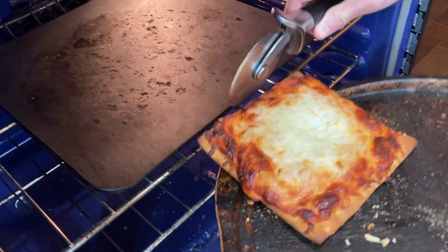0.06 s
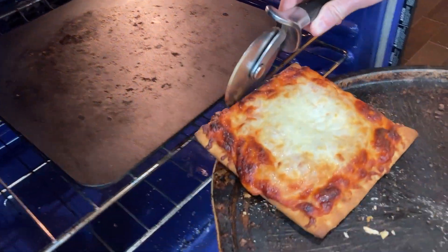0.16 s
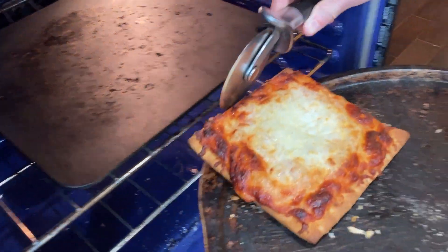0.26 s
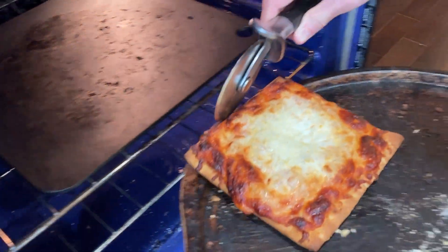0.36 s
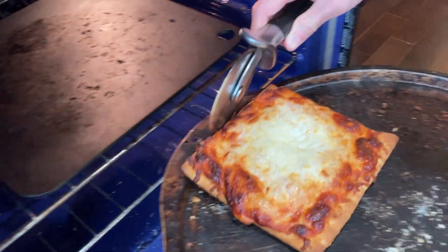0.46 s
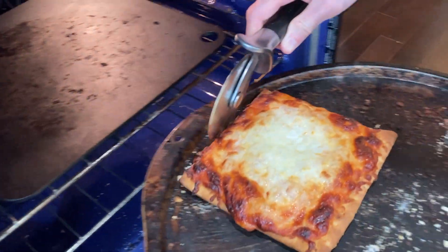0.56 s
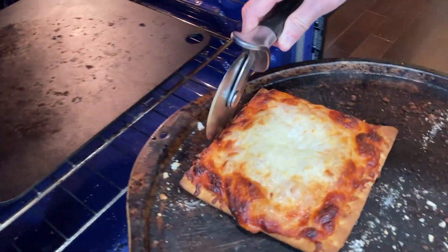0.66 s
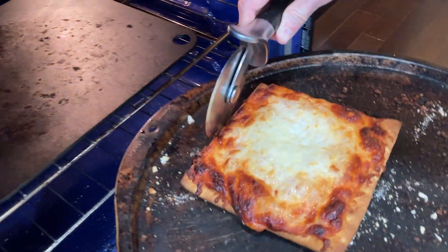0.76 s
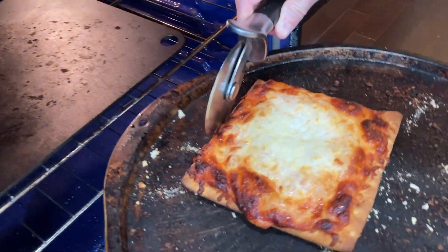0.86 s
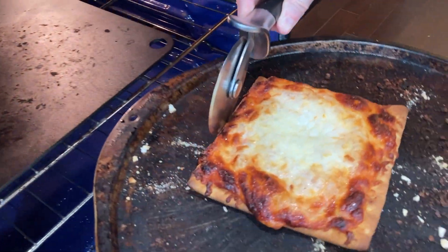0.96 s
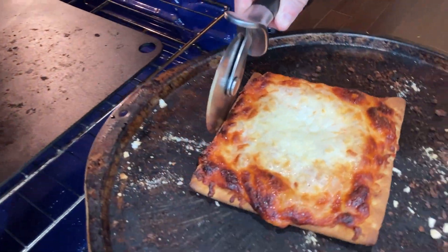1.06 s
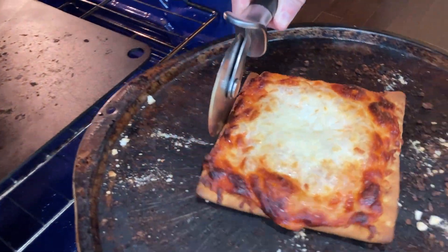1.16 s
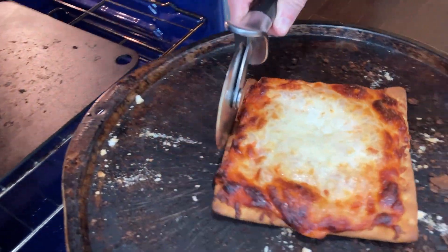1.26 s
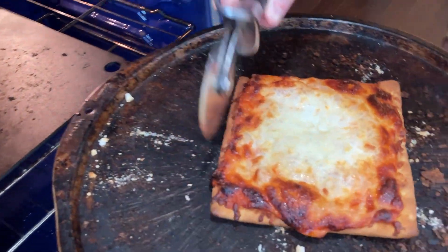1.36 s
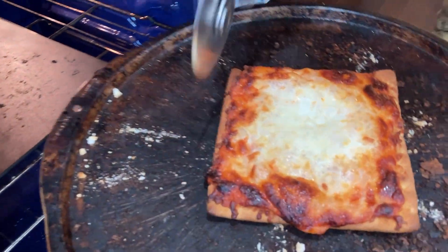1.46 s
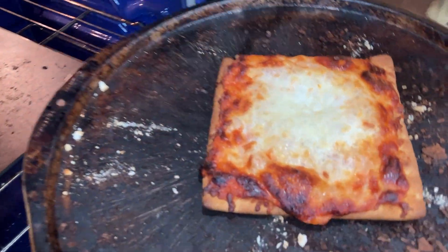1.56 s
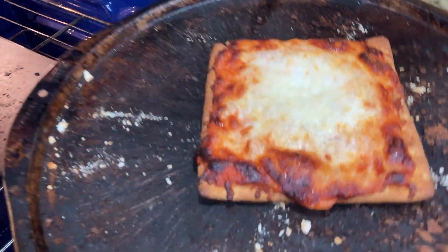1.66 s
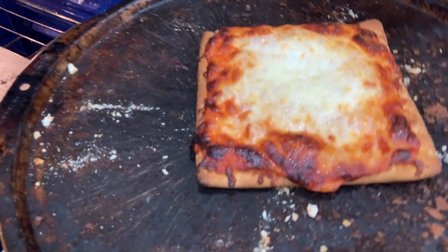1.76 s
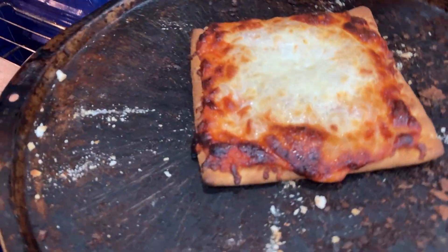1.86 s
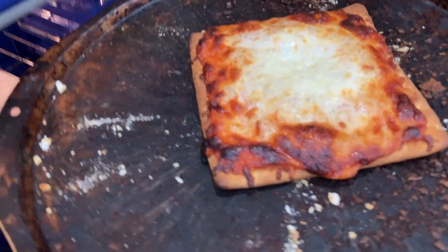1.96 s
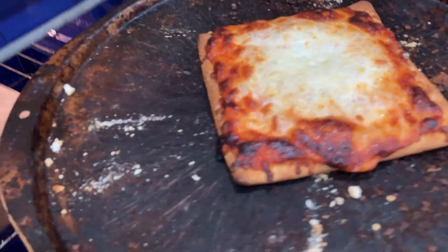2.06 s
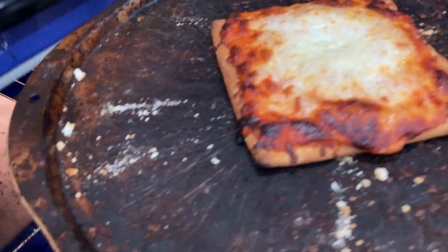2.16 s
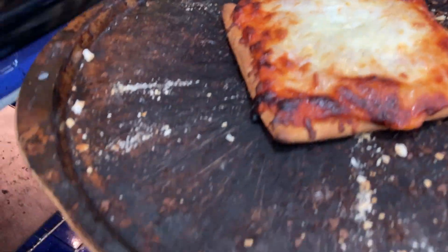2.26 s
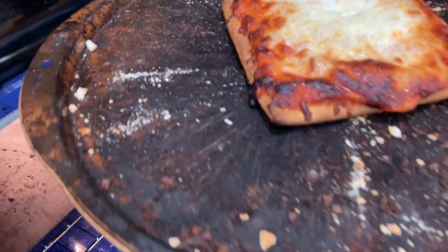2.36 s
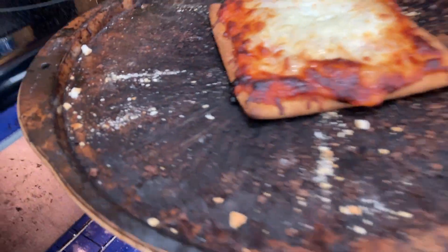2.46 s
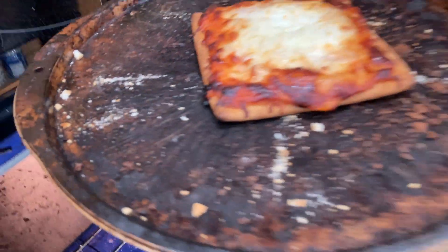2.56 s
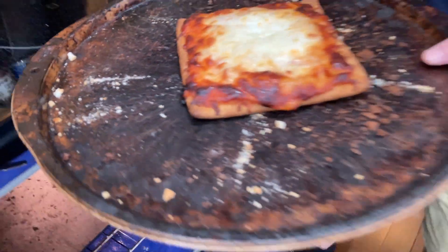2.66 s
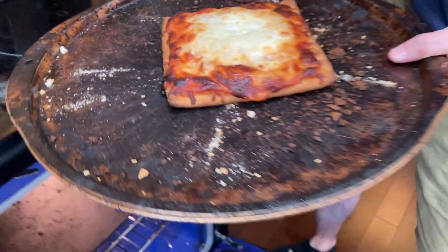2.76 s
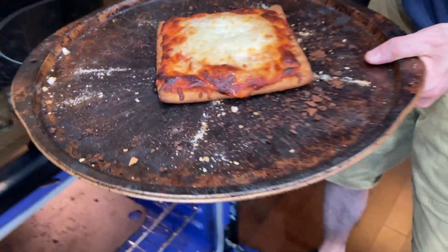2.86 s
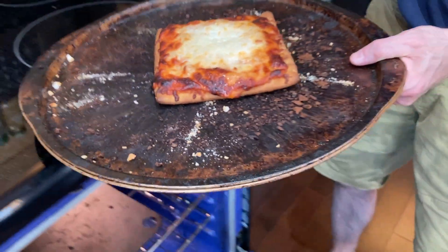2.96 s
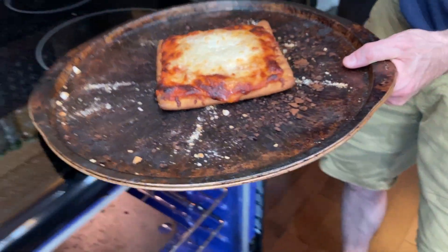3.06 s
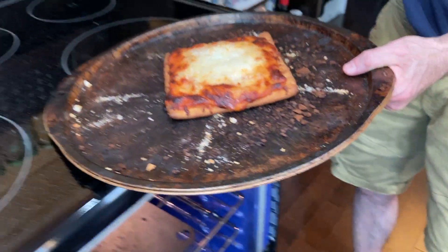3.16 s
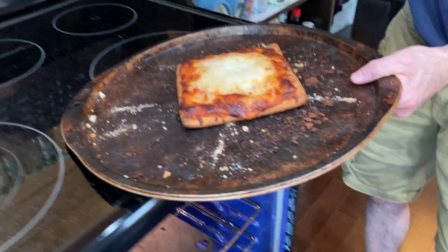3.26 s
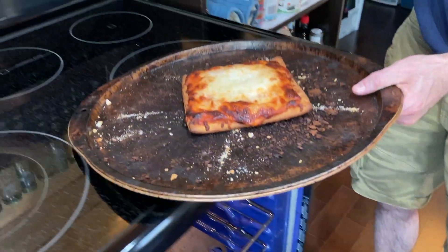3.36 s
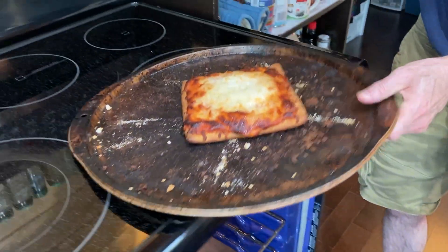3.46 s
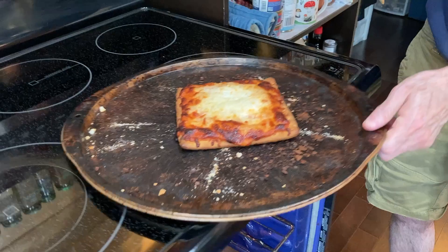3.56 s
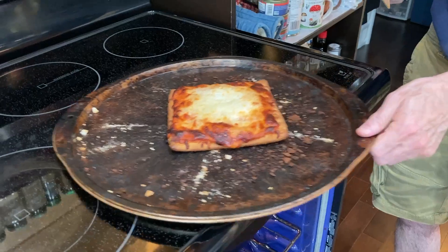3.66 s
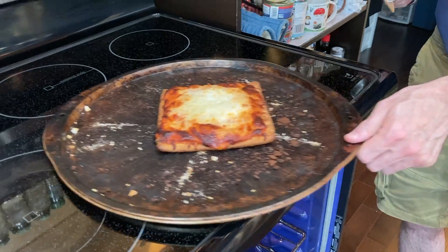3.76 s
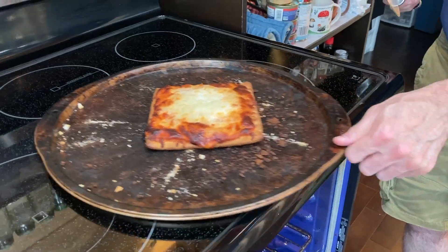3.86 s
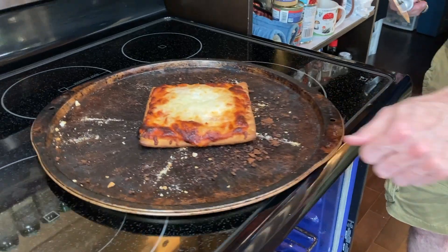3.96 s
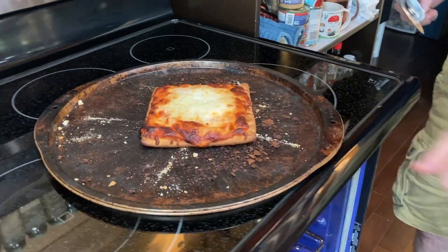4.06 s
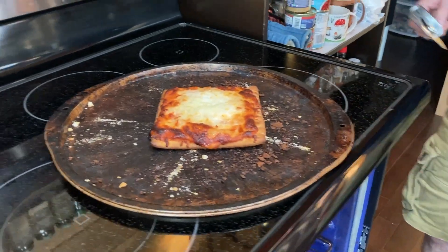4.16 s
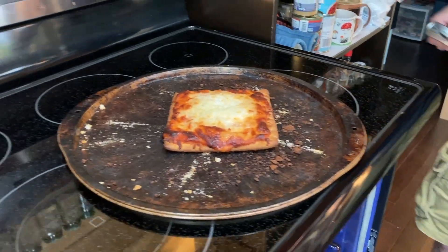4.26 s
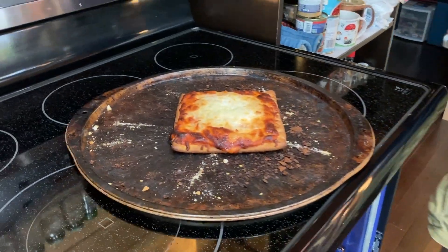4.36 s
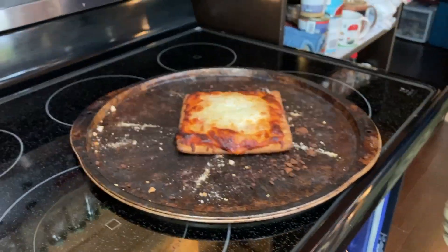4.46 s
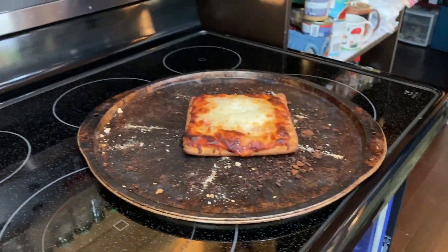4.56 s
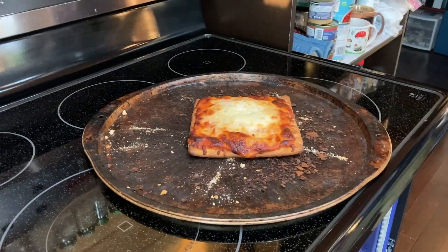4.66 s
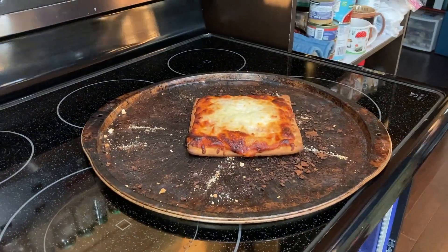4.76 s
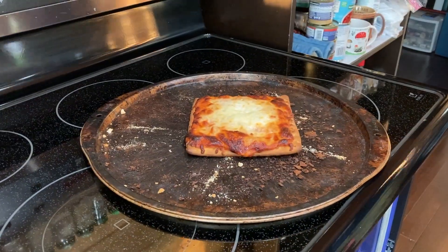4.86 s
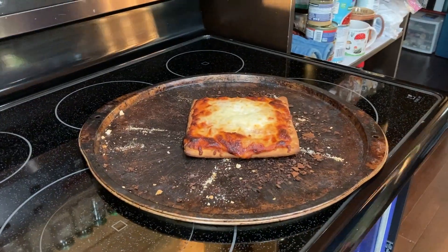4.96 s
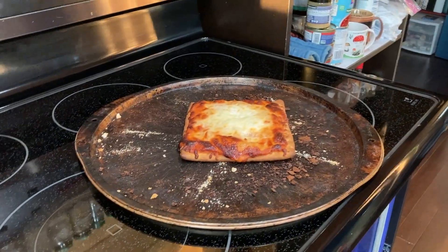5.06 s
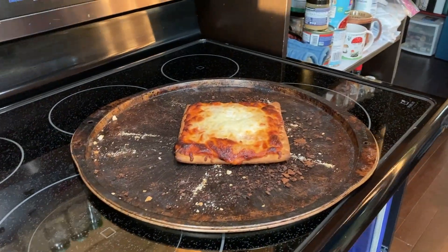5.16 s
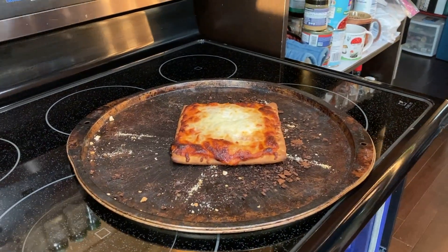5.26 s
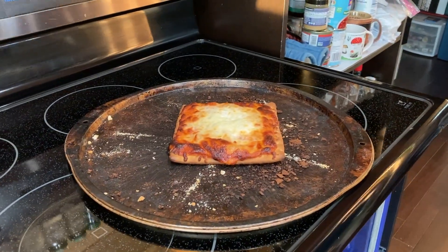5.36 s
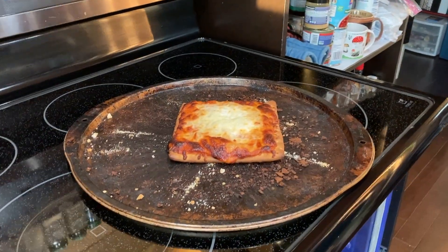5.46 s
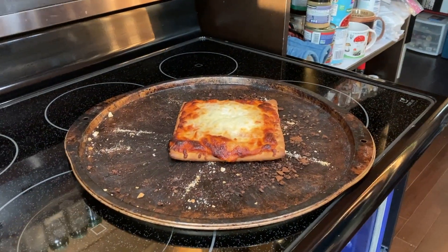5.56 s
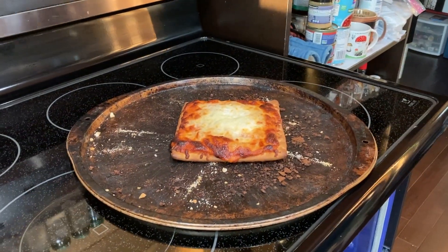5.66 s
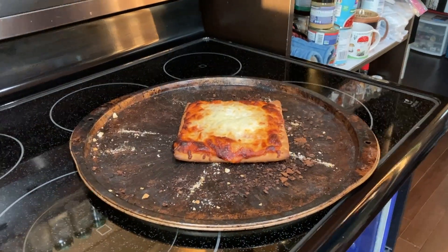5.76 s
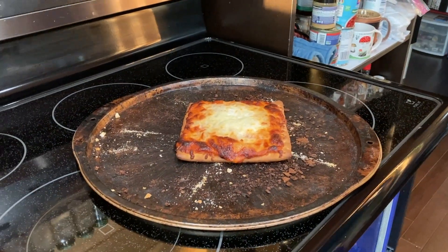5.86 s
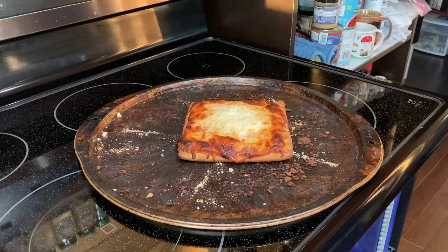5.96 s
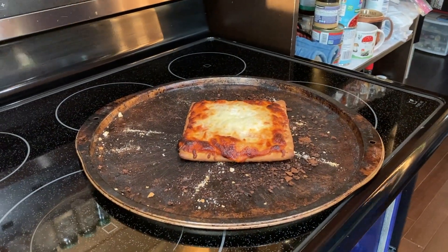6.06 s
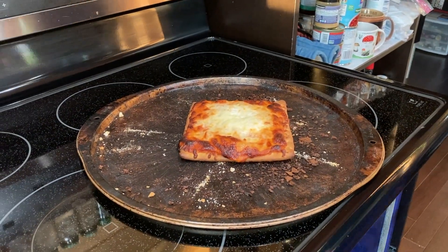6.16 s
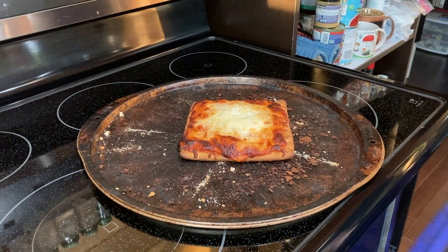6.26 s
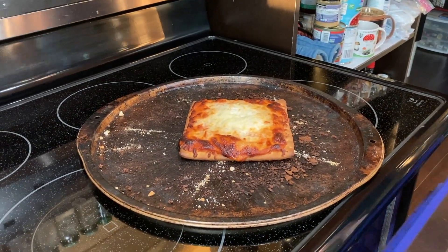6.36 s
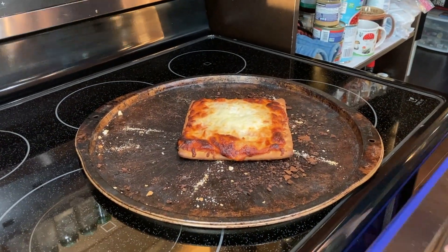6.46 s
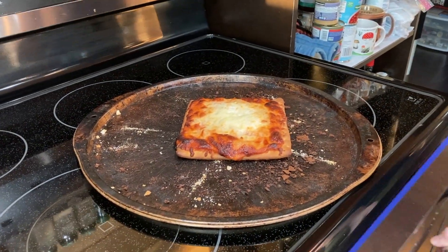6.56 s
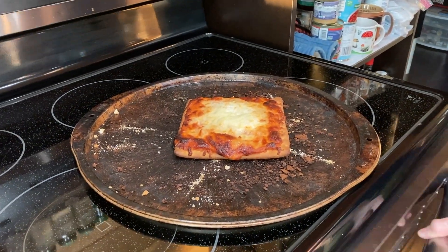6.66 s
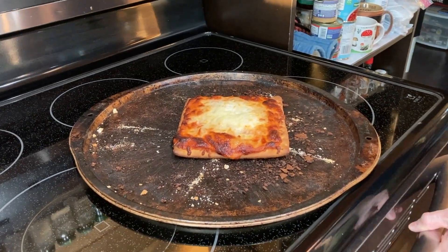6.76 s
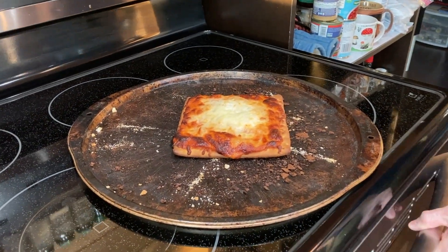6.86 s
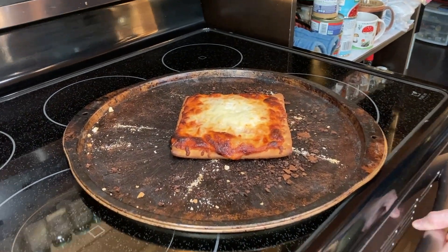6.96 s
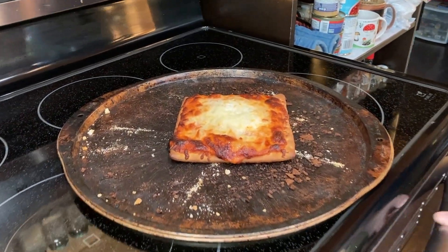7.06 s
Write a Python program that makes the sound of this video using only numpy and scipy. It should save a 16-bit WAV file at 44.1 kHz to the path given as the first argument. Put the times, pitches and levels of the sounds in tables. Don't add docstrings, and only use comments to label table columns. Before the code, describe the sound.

In a humming kitchen, crust scrapes and squeaks over metal, the pan clanks against a rack, slides on glass, and an oven door closes.

```python
import sys
import numpy as np
from scipy import signal
from scipy.fft import rfft, irfft, next_fast_len
from scipy.io import wavfile

SR = 44100
rng = np.random.default_rng(int(sys.argv[2]) if len(sys.argv) > 2 else 0)


def materialize(psi):
    bounded = np.clip(np.atleast_2d(psi).T, -1, 1)
    quanta = np.round(bounded * 32767).astype(np.int16)
    wavfile.write(sys.argv[1], SR, quanta)


def invert_db(x):
    u = np.asarray(x, float) / 20
    return 10 ** u


N = 314080

# pitch_hz, left_minus_right_db
LEAN = [(60, -2), (400, 0.7), (1300, 0.5), (2400, 3), (4400, 1.5)]
# pitch_hz, level_db over the broad colour
PAN_ON_HOB = [(465, 5.5), (545, 6), (730, -5.5), (1050, -6), (1220, -5), (1500, -6.5), (1680, -11),
              (1810, -1), (2040, 5), (2380, 3.5), (2740, 0.5), (3250, -3.5), (3650, -1.5), (4250, 0),
              (4800, 3.5)]


def rms_one(x):
    return x / np.sqrt(np.mean(x ** 2) + 1e-20)


def at_hz(points, hz):
    pitches, values = np.array(points).T
    return np.interp(np.log(hz), np.log(pitches), values)


def by_law(law, hz):
    pitches, *columns = np.transpose(law)
    return [np.interp(np.log(hz), np.log(pitches), c) for c in columns]


def drift(rate, size):
    r = np.exp(-32 * np.pi * rate / SR)
    noise = rng.standard_normal(size // 16 + 2002)
    slow = signal.lfilter([1], [1, -2 * r, r * r], noise)[2000:]
    return np.interp(np.arange(size) / 16, np.arange(len(slow)), rms_one(slow))


def swell_gate(time, start_s, stop_s, edge_s):
    return np.clip(np.minimum(time - start_s, stop_s - time) / edge_s, 0, 1)


def ring(clicks, hz, t60):
    r, w = invert_db(-60 / (t60 * SR)), 2 * np.pi * hz / SR
    return signal.lfilter([0, np.sin(w)], [1, -2 * r * np.cos(w), r * r], clicks + 1e-18)


def port_skew(hz):
    return 0.35 * np.minimum(1, hz / 900) * rng.standard_normal()


def bank(white, gain_at, likeness=None):
    # pitch_hz, left-right likeness from -1 to 1
    close_likeness = [(30, 0.72), (70, 0.96), (130, 0.94), (290, 1), (640, 0.92), (1400, 0.34),
                      (2400, 0.012), (4500, 0.57), (5500, .01)]
    edges_hz = 28 * 2 ** np.arange(0, 9.4, .4)
    out = 0
    for k, (low, high) in enumerate(zip(edges_hz, edges_hz[1:])):
        band = signal.butter(2, [low, high], "band", fs=SR, output="sos")
        mid, side = signal.sosfilt(band, white[k % 2])
        hz = np.sqrt(low * high)
        alike = np.clip(at_hz(likeness or close_likeness, hz), -1, 1)
        lean = invert_db(at_hz(LEAN, hz) / 2)
        pair = np.sqrt(1 + alike) * mid + np.sqrt(1 - alike) * side * [[1], [-1]]
        out = out + gain_at(hz) * pair * [[lean], [1 / lean]]
    return out


def sheet(x, peaks, ring_db, wander_db, wander_rate):
    out = x.copy()
    for hz, db in peaks:
        r = np.exp(-np.pi * (20 + 0.023 * hz) / SR)
        wander = wander_db * np.minimum(drift(wander_rate, x.shape[1]), 1)
        drive = x * invert_db(ring_db + db + wander)
        top, bottom = [(1 - r * r) / 2, 0, (r * r - 1) / 2], [1, -2 * r * np.cos(2 * np.pi * hz / SR), r * r]
        out += signal.lfilter(top, bottom, drive)
    return out


def friction(table, law, mean_db, peaks, per_s, size_db, judder_db, ring_db, trim_db, dead):
    # pitch_hz, level_db per Hz
    grit_colour = [(30, -5), (80, -2), (200, 1.5), (450, -6.5), (1600, -9.5), (2300, -9), (3000, -9),
                   (4500, -10), (7000, -11.5), (11000, -12.5), (16000, -24)]
    # low_hz, high_hz
    dead_band = [2890, 3120]
    s, *levels = np.transpose(table)
    start, stop = round(s[0] * SR), min(round(s[-1] * SR), N)
    size = stop - start
    pressure_db, second_db = [np.interp(np.arange(start, stop) / SR, s, c) for c in levels]

    def gain(hz):
        offset_db, follows, share = by_law(law, hz)
        level_db = mean_db[0] + offset_db + follows * (pressure_db - mean_db[0])
        level_db = level_db + share * (second_db - mean_db[1])
        return invert_db(at_hz(grit_colour, hz) + level_db + trim_db + 1.43 * drift(24, size))

    catches = (rng.random(size) < per_s / SR) * invert_db(size_db * np.minimum(rng.exponential(1, size), 4))
    judder = invert_db(judder_db * drift(70, size))
    x = bank(rms_one((catches + 0.47) * rng.standard_normal((2, 2, size)) * judder), gain)
    x = x - dead * signal.sosfilt(signal.butter(1, dead_band, "band", fs=SR, output="sos"), x)
    fade_out = np.minimum(1, np.arange(size, 0, -1) / 900)
    out = np.zeros((2, N))
    out[:, start:stop] = sheet(x, peaks, ring_db, wander_db=5, wander_rate=8.9) * fade_out
    return out


def struck(modes, blows):
    s, db, tilt_db = np.transpose(blows)
    at = np.round(s * SR).astype(int)
    spread_db = 1
    out = np.zeros((2, N))
    for hz, level_db, t60 in modes:
        strength = spread_db * rng.standard_normal((len(at), 3)).T
        lean_db = at_hz(LEAN, hz) * np.array([[.5], [-.5]])
        blow_db = db + tilt_db * np.log2(hz / 400) + level_db
        clicks = np.zeros((2, SR))
        clicks[:, at - at[0]] = invert_db(blow_db + strength[0] + strength[1:] + lean_db)
        out[:, at[0]:at[0] + SR] += ring(clicks, hz, t60) * rng.choice([-1, 1])
    return signal.sosfilt(signal.butter(4, 135, "high", fs=SR, output="sos"), out + 1e-18)


def dying_notes(rows):
    out = np.zeros((2, N))
    for s, db, hz, t60 in rows:
        start = round(s * SR)
        t = np.arange(min(round(t60 * SR), N - start)) / SR
        skew = port_skew(hz)
        rise = np.minimum(1, t * hz * (2.0 if t60 * hz > 12 else .7))
        wave = np.sin(2 * np.pi * hz * t + [[skew], [-skew]])
        out[:, start:][:, :len(t)] += invert_db(db - 60 * t / t60) * wave * rise
    return out


def fan_hum():
    # pitch_hz, level_db
    tones = [(120, -68.5), (194, -77.5)]
    time = np.arange(N) / SR
    return sum(invert_db(db + 2.0) * np.sin(2 * np.pi * hz * time) for hz, db in tones)


def kitchen_air():
    # pitch_hz, level_db per Hz
    room_colour = [(30, -15.5), (60, 9), (120, 5), (250, -12.5), (1000, -23.5), (2300, -9.5), (3500, -45.5),
                   (8000, -28), (12000, -39.5), (16000, -47)]
    # pitch_hz, left-right likeness from -1 to 1
    room_likeness = [(60, 0.85), (180, 0.82), (550, 0.49), (1650, -0.18), (4970, -0.06), (15000, -0.94)]
    # pitch_hz, level_db per Hz
    moving_colour = [(30, 14.5), (80, 23), (450, 11.5), (1600, 9.5), (6000, 4.5), (11000, 7.5),
                     (16000, -3.5)]
    # pitch_hz, level_db relative to the tread
    tread_colour = [(60, 0), (200, -3.5), (450, -9.5), (1600, -16), (6000, -33)]
    # pitch_hz, level_db relative to the cloth, share of its swing
    cloth_law = [(80, -12, .5), (444.7, -0.5, 0.36), (1600, -1.7, 0.82), (6000, -6, 0.97)]
    # time_s, cloth_db, tread_db on the floor
    swing = [
        (1.4, -68.5, -71),
        (1.65, -71.5, -75),
        (1.82, -67.5, -77),
        (2.03, -62, -64.5),
        (2.24, -62, -66),
        (2.3, -73, -63),
        (2.6, -71.5, -75),
        (2.8, -78.5, -82),
        (3.14, -75.5, -60.5),
    ]
    # time_s, cloth_db, tread_db on the floor
    steps = [
        (4.2, -81.5, -64.5),
        (4.55, -78.5, -72),
        (4.96, -69.5, -57.5),
        (5.38, -70, -71.5),
    ]
    # time_s, cloth_db, tread_db on floor and door
    door = [
        (5.41, -76.5, -54),
        (5.65, -80, -62),
        (6.05, -77, -51),
        (6.25, -74.5, -54.5),
        (6.598, -72, -63.5),
        (6.95, -74.5, -59),
        (7.12, -75.5, -59.5),
    ]
    room_db, cloth_mean_db, flicker_db = -71, -68.5, 2
    time = np.arange(0, N, 16) / SR
    s, *levels = np.transpose(swing + steps + door)
    cloth_db, tread_db = [np.interp(time, s, c) for c in levels]
    busy = sum(swell_gate(time, m[0][0], m[-1][0] + .02, 0.007) for m in (swing, steps + door))

    def gain(hz):
        steady = invert_db(room_db + at_hz(room_colour, hz) + 16.0)
        offset_db, share = by_law(cloth_law, hz)
        cloth = invert_db(cloth_mean_db + offset_db + share * (cloth_db - cloth_mean_db))
        tread = invert_db(tread_db + at_hz(tread_colour, hz))
        moving = busy * np.hypot(cloth, tread) * invert_db(at_hz(moving_colour, hz))
        flicker = invert_db(flicker_db * drift(36 * 16, len(time)))
        return np.repeat(np.hypot(steady, moving) * flicker, 16)[:N]

    return bank(rng.standard_normal((2, 2, N)), gain, room_likeness)


def crust_drag():
    # time_s, pressure_db, speed_db as grit over body
    creep = [
        (0, -61.5, -13),
        (.112, -65, -16),
    ]
    nudge = [
        (0.118, -53.5, -11),
        (.19, -54, -10.5),
        (.264, -49, -13.5),
    ]
    shove = [(0.27, -41, -4), (.35, -40.5, -5.5), (.395, -35, -3.5), (.415, -36, -7.5), (.44, -33.5, -6),
             (.49, -35.5, -5), (.527, -31.5, -2.5), (.545, -43.5, -2), (.565, -35.5, -4.5),
             (.66, -38, -7.5), (.7, -35, -4), (.73, -38, -8), (.81, -41, -12.5)]
    last_shove = [
        (.825, -38, -7.5),
        (.905, -31, -9.5),
        (.975, -39.5, -7),
        (1.005, -34, -13),
        (1.045, -39.5, -9.5),
        (1.19, -34, -6),
        (1.27, -29, -10.5),
        (1.299, -34, -11),
        (1.335, -49, -10.5),
    ]
    let_go = (1.43, -82, 2)
    # pitch_hz, level_db relative to pressure, share of pressure swing, share of speed swing
    drag_law = [(60, -11, 0.32, 0.72), (153, -9.5, 0.85, -0.47), (462, 4, 0.79, -0.018),
                (1580, 2, 1.07, -0.066), (5850, -4.5, 0.96, 1)]
    # pitch_hz, level_db over the broad colour
    pan_held = [(147, 8), (208, 1), (240, 2.5), (325, 1), (392, -1), (430, 1), (490, -2.5), (592, 2),
                (848, -0.5), (994, -10.5), (1100, -5), (1205, 7.5), (1382, 7), (1480, 4.5), (1560, 7.5),
                (1760, 7), (1958, 5), (2090, -3.5), (2500, -7), (4080, 3), (4740, 5), (6900, -6)]
    path = np.concatenate([creep, nudge, shove, last_shove, [let_go]])
    return friction(path, drag_law, (-28.5, -6.5), pan_held, per_s=2500, size_db=2.2, judder_db=1.5,
                    ring_db=-3.0, trim_db=12.0, dead=0.8)


def cutter_rings():
    # start_s, level_db, pitch_hz, t60_s
    rings = [
        (0.07, -50, 203, .3),
        (0, -44, 335, 0.6),
        (0, -68, 1620, .3),
        (0.12, -32.5, 336, 0.088),
        (.119, -56, 1490, 0.37),
        (1.317, -48, 7420, 0.36),
        (1.433, -64, 9790, 0.3),
        (1.43, -66, 7420, .5),
        (0, -66, 9790, .5),
    ]
    return dying_notes(rings)


def ticks():
    # start_s, peak_db, pitch_hz
    tick_table = [(.027, -84, 4500), (.05, -65, 8040), (.05, -58.5, 11000), (.078, -66, 4500),
                  (.078, -67, 6940), (.11, -66, 7300), (.22, -48, 11300), (.527, -37.5, 11600),
                  (1.162, -26, 7780), (1.4293, -47, 8200), (1.5858, -53, 7600), (1.6866, -43, 9360),
                  (1.7533, -53, 7600), (1.8188, -55, 7500), (1.847, -54, 7060), (1.919, -45, 11640),
                  (1.94, -47, 11700), (1.9654, -46, 11260), (2.013, -47, 11300), (2.062, -39, 11900),
                  (2.189, -51, 7100), (2.5052, -55.5, 11000), (2.5177, -46.5, 10100), (2.633, -55, 7650),
                  (2.818, -47, 9760), (4.3067, -60.5, 7690), (4.3515, -60, 7260), (5.633, -61, 7100),
                  (5.634, -66, 4050), (5.607, -70, 3500), (5.9763, -60, 6340), (2.387, -54, 11000), ]
    return dying_notes([(s, db + 14.0, hz, 11 / hz) for s, db, hz in tick_table])


def knocks():
    # time_s, middle_peak_db, treble_db relative to the middle, t60_s
    padded = [
        (0.1181, -46, -48, 0.14),
        (2.808, -56, -32, 0.38),
        (3.2694, -60, -14, 0.19),
        (3.891, -51.5, -5.5, 0.71),
        (4.313, -63, -12.5, 0.45),
        (4.902, -56.5, -22, 0.31),
        (4.939, -57.5, -32, 0.41),
        (5.5465, -57, -30.5, 0.44),
        (5.7347, -61, -29.5, .17),
        (6.7287, -56.5, -11.5, 0.22),
    ]
    snags = [
        (.4356, -36, -7, 0.051),
        (.6725, -36, -5.5, .08),
        (.8297, -37, -6, .06),
        (.889, -35, -10.5, 0.046),
        (1.108, -32.5, -5.5, 0.065),
        (1.238, -32, -7.5, 0.049),
    ]
    rim = [
        (3.151, -17, -13.5, 0.12),
        (3.4062, -49, -4, 0.16),
        (3.477, -45, -13.5, 0.42),
        (3.5442, -38, -17, 0.098),
        (3.6227, -35, -24.5, 0.073),
        (4.112, -34.5, -30.5, 0.27),
        (6.093, -50, -11, 0.3),
    ]
    flat = [
        (.267, -41, -2.5, 0.096),
        (3.1994, -33.5, -13.5, 0.29),
        (3.592, -30.5, -4.5, 0.21),
        (3.7583, -29, -5.5, 0.081),
        (5.8496, -41.5, -15, 0.33),
        (6.4472, -57, -4.5, 0.34),
    ]
    heavy = [
        (0.2174, -52.5, 3, 0.22),
        (3.8353, -44.5, -7.5, 0.44),
        (6.1654, -40, -6, 0.27),
        (6.204, -42.5, -16, 0.077),
        (6.797, -47.5, 12.5, 0.1),
        (6.8, -50.5, 4, 0.45),
    ]
    brushed = [
        (3.1435, -14, -7, 0.063),
        (4.79, -53.5, -5.5, 0.31),
        (4.92, -51, -17, 0.25),
        (5.04, -52.5, -5.5, 0.5),
    ]
    # knocks, body_db relative to the middle, rise_ms
    contacts = [(padded, 2, 1.5), (rim, -14, 0.86), (flat, -3, 1.4), (heavy, 4.9, 0.87), (brushed, -20.5, 28),
                (snags, -4, 0.67)]

    def envelope(hz):
        gain = np.zeros(N)
        for rows, body_db, rise_ms in contacts:
            for s, db, treble_db, t60 in rows:
                colour = [(60, body_db - 9.0), (250, body_db + 12.0), (500, body_db + 2.0), (1600, 2.8),
                          (6000, treble_db), (10000, treble_db), (13500, treble_db - 9.5)]
                level_db = db + at_hz(colour, hz)
                lasts = max(t60, .01) * (hz / 1600) ** -.2
                start = round(s * SR)
                t = np.arange(min(round(lasts * SR), N - start)) / SR
                crack = 1 + 0.25 * np.exp(-t / 0.0034)
                rise = np.minimum(1, t / (max(rise_ms, .2) / 1000 + 1.6 / hz))
                gain[start:][:len(t)] += invert_db(level_db - 60 * t / lasts) * crack * rise
        return gain

    clatter = bank(rng.standard_normal((2, 2, N)) * invert_db(1.5 * drift(82, N)), envelope)
    return sheet(clatter + 1e-18, PAN_ON_HOB, ring_db=-5.5, wander_db=7.5, wander_rate=4.0)


def wheel():
    # pitch_hz, level_db, t60_s
    wheel_modes = [(2090, 0, .3), (2750, -2, .3), (3960, -9, .3), (5612, -6, .3), (7418, -7, .3),
                   (9790, -2, .5), (11570, -5, .3)]
    # time_s, level_db, tilt_db per octave
    wheel_blows = [
        (.1215, -61, 0.01),
    ]
    return struck(wheel_modes, wheel_blows)


def singing():
    # start_s, end_s, pitch_hz, level_db
    locked = [(0.263, 0.32, 1494, -41), (0.266, 0.32, 520, -43.5), (0.21, 0.246, 673, -45),
              (0.416, 0.463, 422, -28), (0.469, 0.542, 428.7, -28.5), (.5, 0.527, 1200, -34.5),
              (0.429, 0.54, 1560, -44.5), (0.548, 0.578, 413, -37), (0.689, 0.748, 1205, -36),
              (0.696, 0.717, 1400, -30), (.69, 0.724, 482, -31), (0.691, .74, 2000, -40.5),
              (0.844, 0.873, 447, -31), (0.851, 0.868, 820, -41.5), (.89, 0.914, 623, -36),
              (0.903, 0.946, 433, -32.5), (1.1, 1.018, 263, -32), (1.1, 1.125, 450, -34.5),
              (1.139, 1.165, 223, -29), (1.18, 1.192, 350, -33), (1.185, 1.26, 1200, -38),
              (1.21, 1.271, 840, -34), (1.24, 1.257, 495, -32), (1.249, 1.293, 227, -34.5),
              (1.165, 1.2, 1800, -42), (1.18, 1.21, 1570, -38), (1.17, 1.195, 2500, -40),
              (.9, .95, 2080, -43.5), (0.356, 0.42, 419, -45), (1.738, 2.2, 1370, -73)]
    out, waver, swell = np.zeros((2, N)), drift(30, N), invert_db(1.4 * drift(40, N))
    for start, stop, hz, db in locked:
        at = np.arange(round(start * SR), round(stop * SR))
        gate = swell_gate(at / SR, start, stop, 0.008)
        skew = port_skew(hz)
        phase = 2 * np.pi * np.cumsum(hz * (1 + 0.004 * waver[at])) / SR
        out[:, at] += invert_db(db) * gate * swell[at] * np.sin(phase + [[skew], [-skew]])
    return out


def thuds():
    # start_s, peak_db, pitch_hz, t60_s
    thumps = [
        (0.524, -29, 112.7, 0.36),
        (3.639, -31, 90, 0.25),
        (4, -43, 154.5, 0.21),
        (4.737, -35.5, 66.2, 0.23),
        (5.547, -35.5, 52.3, 0.15),
        (5.706, -39.5, 76.4, 0.19),
        (5.759, -34, 55.5, 0.21),
        (6.28, -31, 57, 0.17),
        (7.089, -48.5, 115, 0.22),
    ]
    return dying_notes(thumps)


def crackle():
    start_s, stop_s, per_s, level_db = 1.38, 3.1, 26, -63
    time = np.arange(N) / SR
    size_db = 3.2 * np.minimum(rng.exponential(1, N), 3)
    near = (time > start_s) * (time < stop_s)
    clicks = (rng.random(N) < per_s / SR) * invert_db(level_db + size_db) * near
    dealt = rng.integers(0, 3, N)
    return sum(ring(clicks * (dealt == k), hz, 12 / hz) for k, hz in enumerate([7200, 7900, 11200]))


def rack():
    # pitch_hz, level_db, t60_s
    rack_modes = [(165, -13, 0.13), (187.3, -8, 0.16), (384, -12.5, .14), (427, -8, 0.098),
                  (469, -11.5, 0.14), (520, -10, 0.068), (590, -9.5, 0.19), (693, -14, 0.11),
                  (992, -20.5, 0.13), (1350, -19.5, 0.18), (1870, -22.5, 0.12), (1990, -16, 0.11),
                  (2547, -11.5, 0.15), (2740, -16.5, 0.09), (3530, -21, 0.14), (3640, -18.5, .09),
                  (5500, -25, 0.084), (6000, -21.5, 0.041)]
    # pitch_hz, level_db, t60_s
    rail_modes = [(767, -20.5, 0.093), (1130, -17, 0.15), (1387, -17, 0.16), (2640, -19.5, 0.24),
                  (3080, -23.5, .15), (3357, -23.5, 0.13), (3900, -24.5, .15), (4280, -24, 0.18)]
    # time_s, level_db, tilt_db per octave
    rack_blows = [
        (3.1495, -36, 3),
        (3.1512, -20, 1),
        (3.1532, -22, 0.5),
        (3.1573, -17, -3),
        (3.173, -33, -6),
        (3.203, -24.5, -6),
    ]
    return struck(rack_modes, rack_blows) + struck(rail_modes, rack_blows)


def rack_and_pan_notes():
    # start_s, level_db, pitch_hz, t60_s
    notes_of_rack_and_pan = [(3.152, -16.5, 2104, 0.16), (3.152, -30.5, 2450, 0.16), (3.153, -35.5, 4040, 0.11),
                             (3.153, -24.5, 1545, .1), (3.151, -27, 2904, .09), (3.153, -31, 2830, .1),
                             (3.15, -29, 4810, 0.08), (3.152, -31.5, 2339, 0.31), (3.343, -45, 535, 0.07),
                             (3.364, -46.5, 996, 0.17), (3.408, -52, 2440, .12), (3.408, -53, 3020, .1),
                             (3.445, -45, 704, 0.44), (3.474, -43.5, 1659, 0.16), (3.595, -41.5, 2770, .08),
                             (3.594, -44, 1410, 0.073), (3.623, -32, 1030, 0.043), (3.622, -34.5, 405, 0.071),
                             (3.838, -41, 1366, 0.097), (3.838, -53, 2740, .35), (3.905, -56, 1980, 0.22),
                             (3.92, -56, 2380, .2), (3.901, -41.5, 385, 0.39), (5.547, -66, 1830, .08),
                             (5.547, -55, 540, 0.097), (3.408, -37.5, 556, 0.13), (3.446, -35.5, 537, 0.1),
                             (3.474, -33.5, 560, 0.14), (3.475, -42.5, 995, 0.25), (3.472, -43, 1213, 0.21),
                             (3.476, -44, 1827, 0.26), (3.544, -39, 1670, 0.091), (3.545, -42, 2356, 0.086),
                             (3.53, -36, 554, 0.12), (3.622, -30, 1867, 0.039), (3.622, -42, 2070, 0.12),
                             (3.762, -34.5, 1069, 0.17), (3.762, -43, 1280, 0.17), (3.955, -47, 726, 0.23),
                             (4.115, -47, 1400, 0.071), (6.729, -56, 2090, 0.065), (6.797, -25.5, 7060, 0.015),
                             (6.799, -31.5, 520, 0.026)]
    return dying_notes(notes_of_rack_and_pan)


def pan_slide():
    # time_s, pressure_db, weight_db resting on the glass
    slide_path = [
        (3.24, -51.5, -14.5),
        (3.316, -59, -3),
        (3.482, -51, -6),
        (3.59, -52.5, 9.5),
        (3.702, -59, 10.5),
        (3.798, -56, 9),
        (4.004, -62.5, 9.5),
        (4.136, -77, 14),
        (4.3, -97, 8),
    ]
    # pitch_hz, level_db relative to pressure, share of pressure swing, share of weight swing
    slide_law = [(80.5, 7.5, 0.38, 0.87), (450, 1, 1, -0.53), (1630, -1, 0.78, 0.055),
                 (5270, -11, 0.8, 0.28), (10100, -9, 1, 0.78)]
    return friction(slide_path, slide_law, (-56, -2.5), PAN_ON_HOB, per_s=903, size_db=2.4, judder_db=2,
                    ring_db=4.5, trim_db=15.5, dead=0.23)


def door_notes():
    # start_s, level_db, pitch_hz, t60_s
    panels = [(4.94, -51, 597, 0.31), (4.94, -54, 1206, 0.14), (4.938, -54, 1450, .1),
              (4.945, -54, 2030, .12), (4.95, -52, 290, 0.091), (5.395, -48, 316, 0.083),
              (5.431, -60.5, 252, 0.22), (5.853, -47.5, 583, 0.12), (5.854, -54, 1470, 0.084),
              (5.853, -50, 1860, 0.11), (5.735, -60, 1130, .05), (5.854, -48, 3720, 0.05),
              (5.853, -51, 4380, 0.04), (6.093, -59, 2740, .1), (6.093, -61, 3520, .06),
              (6.17, -49, 435, 0.14), (6.169, -45, 1254, 0.11), (6.169, -47, 1516, .08),
              (6.169, -52, 2030, 0.11), (6.449, -61, 1707, .1), (6.72, -59, 1130, .1),
              (6.21, -40.5, 233, 0.17), (6.729, -64, 3280, 0.036), (6.797, -41, 6600, .04),
              (6.797, -44, 2600, .05), (6.797, -45, 1760, .05), (6.809, -44.5, 204, 0.091),
              (6.797, -40, 4070, 0.05), (6.8, -47, 4900, 0.13), (6.815, -41.5, 658, 0.081),
              (6.855, -55, 300, 0.1)]
    return dying_notes(panels)


def hinge():
    # start_s, end_s, level_db
    turns = [
        (5.705, 5.815, -73),
        (7.024, 7.142, -64.5),
    ]
    time = np.arange(N) / SR
    gate = sum(invert_db(db) * swell_gate(time, start, stop, 0.039) for start, stop, db in turns)
    band = signal.butter(2, [11200, 13200], "band", fs=SR, output="sos")
    hiss = signal.sosfilt(band, rng.standard_normal(N))
    return gate * rms_one(hiss) * invert_db(2.2 * drift(60, N))


def door_creak():
    # start_s, end_s, pitch_hz, level_db
    creak = (7.05, 7.14, 562, -57)
    start, stop, hz, db = creak
    time = np.arange(N) / SR
    turns = np.cumsum(hz * (1 - .4 * (time - start) + 0.0079 * drift(25, N))) / SR
    tone = np.sin(2 * np.pi * turns) + 0.16 * np.sin(4 * np.pi * turns)
    return invert_db(db) * swell_gate(time, start, stop, 0.011) * tone


def kitchen(x):
    t60_s, wall_cut_hz, bass_hz = 0.19, 3900, 500
    size = next_fast_len(N + SR)
    w = 2 * np.pi * np.arange(size // 2 + 1) / size
    hz = w * SR / (2 * np.pi)
    dull = 1 / (1 + 1j * hz / wall_cut_hz)
    thin = 1 / (1 + bass_hz / (1j * hz + 1))
    out = np.zeros((2, len(w)), complex)
    for k, lag in enumerate((rng.uniform(.009, .03, 16) * SR).astype(int)):
        loop = invert_db(-60 * lag / SR / t60_s) * np.sqrt(dull) * np.exp(-1j * w * lag)
        out[k % 2] += loop / (1 - loop) * (-1) ** (k // 2)
    return irfft(out * thin * rfft(x.mean(axis=0), size), size)[:, :N]


def scene():
    near = crust_drag() + cutter_rings() + ticks() + knocks() + wheel() + singing() + thuds()
    near += crackle() + rack() + rack_and_pan_notes() + pan_slide()
    near += door_notes() + hinge() + door_creak()
    echo_db = -12.5
    return near + invert_db(echo_db) * kitchen(near) + kitchen_air() + fan_hum()


def low_pass(x):
    return signal.sosfilt(signal.butter(12, 15960, fs=SR, output="sos"), x)


def record(dry):
    lag_s, join_hz, bass_cut_hz, top_hz = 0.0002197, 5700, 30, 15850
    hz = np.fft.rfftfreq(N, 1 / SR)
    left, right = rfft(dry)
    joined = 1 / (1 + (join_hz / np.maximum(hz, 1)) ** 12)
    late = -right * np.exp(-2j * np.pi * hz * lag_s)
    left = np.sqrt(1 - joined) * left + np.sqrt(joined) * late
    passed = 1 / np.sqrt((1 + (bass_cut_hz / np.maximum(hz, 1)) ** 4) * (1 + (hz / top_hz) ** 120))
    return low_pass(irfft(np.array([left, right]) * passed, N))


dry = scene()
out = record(dry)
materialize(out)
```